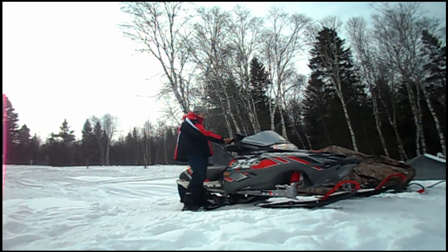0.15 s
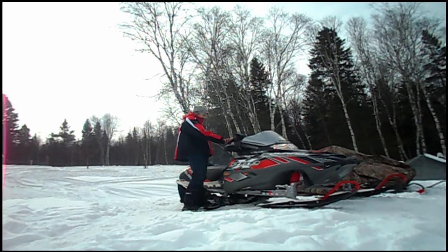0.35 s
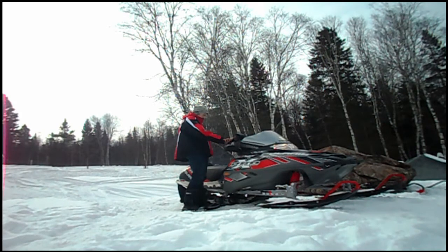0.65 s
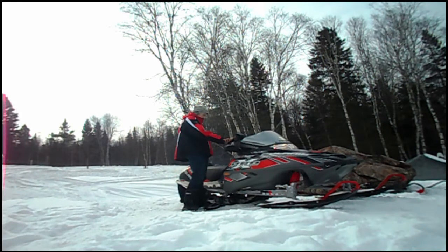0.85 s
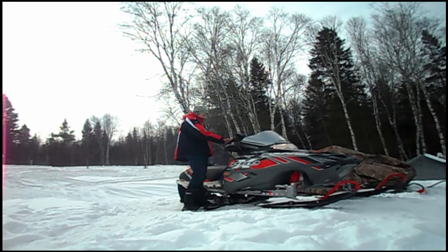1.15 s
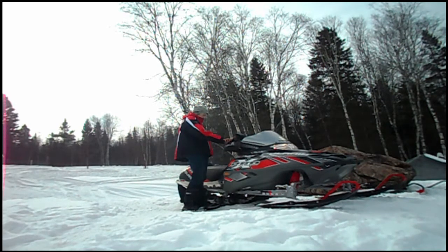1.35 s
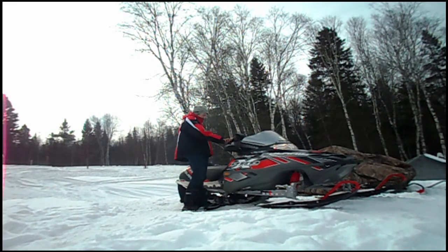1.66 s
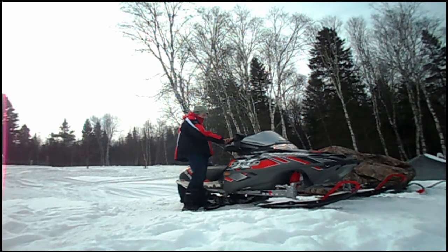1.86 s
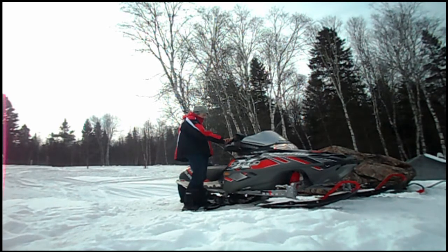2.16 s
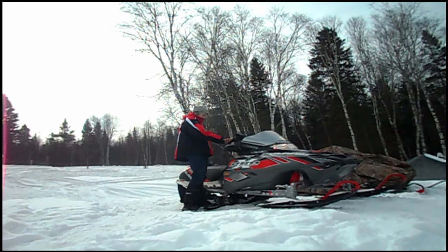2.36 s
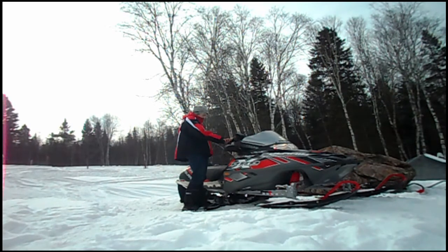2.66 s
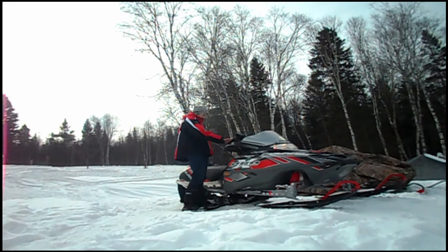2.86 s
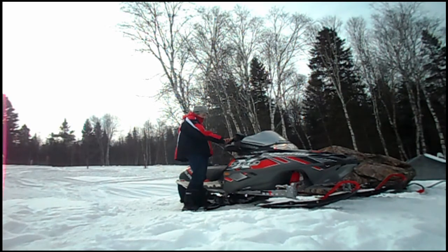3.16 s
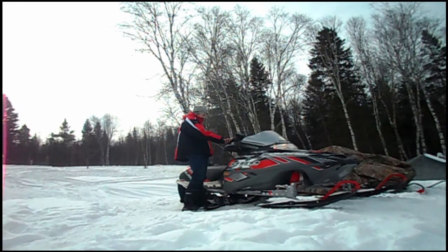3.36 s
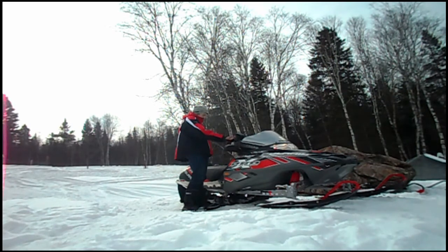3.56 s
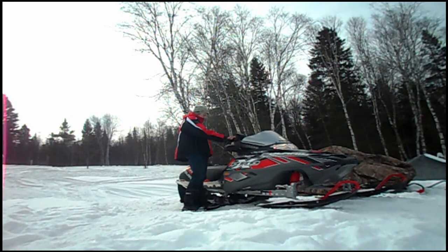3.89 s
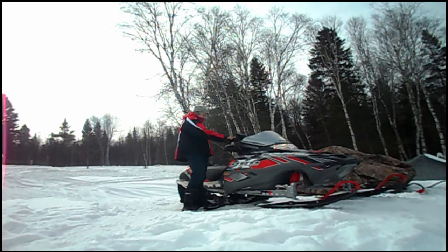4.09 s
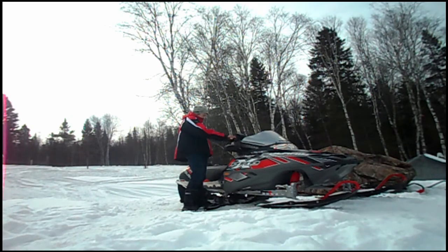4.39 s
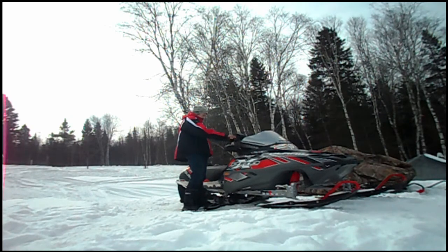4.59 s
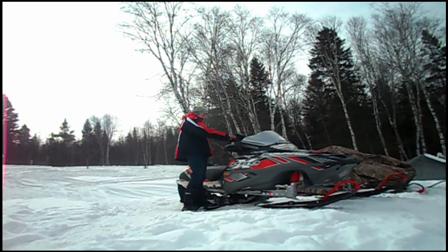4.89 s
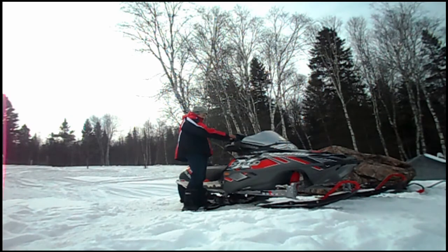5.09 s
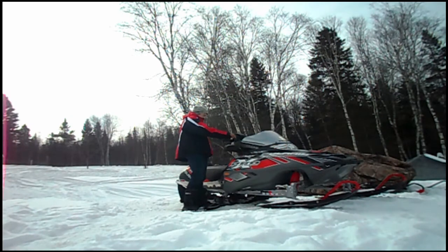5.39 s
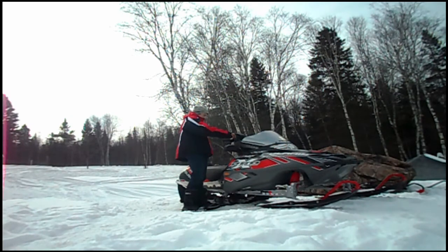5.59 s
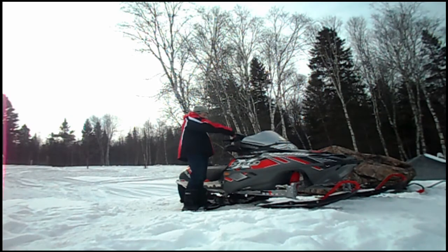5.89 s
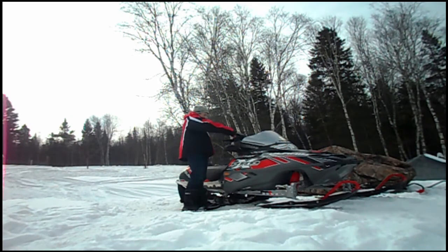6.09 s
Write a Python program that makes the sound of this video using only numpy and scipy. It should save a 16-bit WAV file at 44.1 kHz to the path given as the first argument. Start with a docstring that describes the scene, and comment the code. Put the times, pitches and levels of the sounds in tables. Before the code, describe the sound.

A two-stroke snowmobile is already idling at the start, close by in an open field with no echo. Loud exhaust pops stumble along in a quick, irregular rhythm over an even low throb, metallic piston clatter and a little hiss. The idle holds the same speed until about 4.2 seconds, when the engine is switched off and the popping stops. The throb falls in pitch and fades as the strokes slow and separate, with a light metallic ring from the clutch. Around 5 seconds the belt gives a few short, rough squeaks and scrapes. From about 5.2 to 6.1 seconds the machine rocks to rest with several soft knocks and low thumps. From about 5.5 seconds, small birds give very faint, thin, high whistles over a faint steady wind, until the sound ends just after 6 seconds.

```python
"""A two-stroke twin snowmobile idles in a snowy field. Only some strokes fire, so loud exhaust pops
stumble over an even bed of pumping air and piston clatter. The ignition is cut and the engine winds
down: the clutch sings, the belt rasps, and the machine rocks to rest with a few knocks and thumps.
Small birds whistle thinly in the tail, over a faint wind."""
import sys
import numpy as np
from scipy import signal
from scipy.fft import rfft, irfft, next_fast_len
from scipy.io import wavfile
from scipy.ndimage import map_coordinates

SR = 44100
rng = np.random.default_rng(int(sys.argv[2]) if len(sys.argv) > 2 else 0)


def wav_out(sig):
    """Save sig, one row per channel (or a flat mono array), as 16-bit PCM at SR to the path in sys.argv[1]."""
    wavfile.write(sys.argv[1], SR, np.round(np.clip(np.atleast_2d(sig).T, -1, 1) * 32767).astype(np.int16))


N = 275178
IDLE_HZ, CUT_S = 67.3, 4.245  # strokes per second at idle; when the ignition is cut

# stumbling rhythm of the pops: (time [s], accent [dB], strokes firing in a row [count])
POP_PATTERN = [(.04, -2.5, 2), (.131, -5.5, 1), (.207, -1, 1), (.253, -0.5, 1), (.374, -.5, 2),
               (.466, -1, 2), (.585, -0.5, 1), (.63, -7.5, 1), (.704, 0.5, 2), (.821, -1, 2),
               (.897, -5.5, 2), (.987, -1.5, 1), (1.032, -1, 1), (1.138, 2, 2), (1.27, -2.5, 1),
               (1.315, .5, 1), (1.359, -0.5, 1), (1.463, -6, 2), (1.522, -3, 1), (1.566, -1.5, 1),
               (1.64, -4.5, 1), (1.685, 0, 1), (1.76, -6, 2), (1.849, -3, 1), (1.893, -1, 1),
               (1.997, -2.5, 2), (2.101, -1, 1), (2.146, 0, 1), (2.279, -4, 2), (2.355, -3.5, 1),
               (2.4, 0, 1), (2.502, -1.5, 1), (2.545, -1.5, 1), (2.663, 0, 2), (2.764, -2.5, 2),
               (2.867, -6.5, 2), (2.957, -2, 2), (3.029, -2, 1), (3.073, -2.5, 1), (3.161, -2, 2),
               (3.25, -7, 2), (3.338, -1.5, 1), (3.427, -1, 1), (3.472, -7.5, 1), (3.563, 0, 1),
               (3.637, -7.5, 1), (3.699, -4, 2), (3.821, 0.5, 1), (3.896, 0, 2), (3.999, -1, 1),
               (4.071, -1, 1), (4.115, -3.5, 1), (4.204, -2.5, 1)]
# body of the pipe and silencer: (frequency [Hz], width [Hz], gain [dB])
PIPE_MODES = [(53, 13, -20.5), (66, 46.4, -18.5), (169, 61, -22), (279.5, 18.6, 0), (600, 25, 14)]
# rush of exhaust gas: (frequency [Hz], level [dB])
GAS_SPECTRUM = [(300, -46), (480, 10), (900, 8.5), (1800, 4.5), (3000, 0.5), (4200, -3), (6000, -3.5),
                (8500, -2.5), (10200, 0.5), (11500, -14), (13500, -20), (15500, -28)]
# bright crack of the opening exhaust port: (frequency [Hz], level [dB])
CRACK_SPECTRUM = [(3500, 3), (6000, -18.5), (8500, 2), (10300, 5), (12000, -2), (15500, -13)]
# dry knock of combustion: (frequency [Hz], level [dB])
COMBUSTION_SPECTRUM = [(700, -12), (1050, -1), (1350, 5), (1900, -0.5), (2700, -7), (4000, -13),
                       (10000, -21), (12000, -42)]
# tone the airbox gives the pumped air: (frequency [Hz], gain [dB])
AIRBOX_EQ = [(12, -7), (22, -29), (36, -15), (47, 7.5), (67, 2), (100, 5.5), (135, 1), (165, 6.5),
             (200, -2.5), (235, -9), (278, 11.5), (335, -2), (400, -30), (600, 0), (900, -50)]
# swell and dip of the pumping's upper harmonics as the crank slows: (time [s], gain [dB])
OVERTONE_RIDE = [(4.2, -1), (4.35, 4), (4.5, 4.5), (4.6, -13), (4.8, -7.5), (5.0, -5.5), (5.3, -2.5)]
# low rumble of churned air: (frequency [Hz], level [dB])
CHURN_SPECTRUM = [(16, -7), (30, 0.5), (60, -9), (95, -3), (125, 0), (175, -4), (230, -6.5), (290, -7),
                  (370, -16.5), (600, -42), (2000, -80)]
# ring of the crankcase, clutch and hood: (frequency [Hz], width [Hz], gain [dB])
CASING_MODES = [(582, 82, -1.5), (776, 59, -1.5), (1064.4, 39, 4), (1152, 84, 1.5), (1314, 48, -2),
                (1394, 24, -10), (1866, 49, -11.5), (2030, 21.6, 1), (2225, 88, -9.5), (2454, 33, -4),
                (2405, 43, -24), (2548, 30, -1), (2787, 17, -22), (2940, 42, -39), (3030, 15, -3),
                (3254, 26, -2.5), (3490, 18, -5), (3670, 52, -13)]
# singing clutch sheaves: (frequency [Hz], width [Hz], gain [dB])
CLUTCH_MODES = [(1190, 100, 5), (2030, 83, 4.5), (2200, 160, -8), (2390, 111, -21), (2940, 77, -22)]
# rattle of bearings and clutch: (frequency [Hz], level [dB])
RATTLE_SPECTRUM = [(380, -4), (560, 4.5), (900, 9), (1120, 7.5), (1400, 6), (1700, 0), (2070, -0.5),
                   (2650, 2), (3200, -9), (4000, -23), (6000, -61), (12000, -80)]
# airy hiss on top of the clatter: (frequency [Hz], level [dB])
HISS_SPECTRUM = [(2500, 1.5), (3500, -3), (4300, -5), (5400, -4.5), (8000, -6), (9900, -4.5),
                 (11800, -17.5), (14000, -24), (15600, -31)]
# last knocks of the crank and clutch: (time [s], level [dB])
KNOCK_CUES = [(5.361, -45), (5.383, -48.5), (5.425, -50), (5.479, -45), (5.542, -51.5), (5.603, -56)]
# dull tone of those knocks: (frequency [Hz], level [dB])
KNOCK_SPECTRUM = [(120, -31), (200, -5), (307, -2.5), (470, -15.5), (1310, -6), (1920, -25), (2550, -21),
                  (3750, -43), (6000, -30), (7800, -60), (13200, -120)]
# brief scrapes of the slowing drive: (time [s], level [dB])
SCRAPE_CUES = [(4.862, -43), (4.997, -46.5), (5.502, -61), (5.527, -61)]
# bright tone of those scrapes: (frequency [Hz], level [dB])
SCRAPE_SPECTRUM = [(1500, -26), (3500, 4), (6000, 4), (8300, 1), (10300, 0), (13000, -31)]
# soft thumps of the engine on its mounts: (time [s], pitch [Hz], level [dB])
THUMP_CUES = [(5.191, 50.4, -28), (5.262, 46.8, -30), (5.385, 38.4, -29.5), (5.479, 187, -36),
              (5.505, 55.5, -36), (5.59, 68.6, -35), (5.628, 43.3, -35.5), (5.778, 59, -45.5),
              (6.109, 45, -35.5)]
# bird whistles: (time [s], length [s], start pitch [Hz], middle pitch [Hz], end pitch [Hz], level [dB])
BIRD_CUES = [(5.45, 0.28, 6400, 6430, 6450, -75), (5.665, .028, 6460, 6350, 5600, -67),
             (5.72, 0.071, 6450, 6440, 7000, -74), (5.803, .08, 8850, 8550, 8450, -73),
             (5.865, .035, 9100, 9120, 9100, -68), (5.925, .1, 8850, 8600, 8780, -73),
             (6.087, .07, 8700, 8660, 8450, -74)]
# wind over the field: (frequency [Hz], level [dB])
WIND_SPECTRUM = [(11, -27), (18, 10.5), (66, -10), (131, -17.5), (217, -22.5), (250, -22.5), (2210, -35),
                 (3680, -37.5), (5320, -39.5), (7900, -39.5), (8850, -33.5), (10200, -39.5), (15600, -53)]


def exhaust(soft_hz=181, pop_db=-10, gas_db=-30.5, crack_db=-40):
    """The port opens with a crack, and a rounded pulse rings the pipe amid a rush of gas."""
    times, accent_db = firings()
    pipe = lambda f: -resonances(PIPE_MODES)(f) * np.exp(-(f / soft_hz) ** 2)
    single_pop = filtered(impulses(np.ones(1), np.ones(1)), pipe)
    pops = filtered(impulses(times + .00044, amp(accent_db)), pipe) / np.abs(single_pop).max()
    gas = noise(GAS_SPECTRUM) * bursts(times + .0028, amp(accent_db), rise=.0091, decay=.012)
    crack = noise(CRACK_SPECTRUM) * bursts(times - .004, amp(1.3 * accent_db), rise=.0015, decay=.011)
    return amp(pop_db) * pops + amp(gas_db) * gas + amp(crack_db) * crack


def firings(second_db=-5, carryover=.44):
    """Time and accent [dB] of each firing; a weak pop leaves more charge for the next stroke."""
    times, db, in_a_row = np.transpose(POP_PATTERN)
    twice = in_a_row > 1
    return np.r_[times, times[twice] + 1 / IDLE_HZ], np.r_[db, second_db - carryover * db[twice]]


def speed(friction_hz_per_s=43.4, drag_per_s=.22):
    """Crank speed as a share of idle: steady until the cut, then braked by dry friction and drag."""
    brake = friction_hz_per_s / drag_per_s / IDLE_HZ
    since_cut = np.maximum(clock() - CUT_S, 0)
    return np.maximum((1 + brake) * np.exp(-drag_per_s * since_cut) - brake, 0)


def crank():
    """Running count of strokes since the first pop; every pop lands on a whole stroke."""
    t, fired = clock(), np.array(POP_PATTERN)[:, 0]
    strokes = np.r_[0, np.cumsum(np.round(np.diff(fired) * IDLE_HZ))]
    lead_in = IDLE_HZ * np.minimum(t - fired[0], 0)
    coasting = IDLE_HZ * np.cumsum(speed() * (t > fired[-1])) / SR
    return lead_in + np.interp(t, fired, strokes) + coasting


def cylinder(times):
    """Which of the two cylinders, 0 or 1, fires at each time."""
    return np.round(np.interp(times, clock(), crank())) % 2


def combustion(knock_db=-36, harder_db=5, lead_s=.012):
    """Just before the port opens, the burning charge knocks, harder in the second cylinder."""
    times, accent_db = firings()
    sizes = amp(knock_db + .78 * accent_db + harder_db * cylinder(times))
    return noise(COMBUSTION_SPECTRUM) * bursts(times - lead_s, sizes, rise=.0018, decay=.0066)


def pings(start_hz=3280, fall_hz=560, fall_s=.025, spread_hz=120, strike_db=-35, ring_db=-41):
    """Hot gas rings after each firing, with a sharp ping in the first cylinder; it sinks as it cools."""
    times, accent_db = firings()
    detune, scatter_db = rng.standard_normal((len(times), 2)).T
    ignitions = np.array(POP_PATTERN)[:, 0] - .009
    latest = np.maximum(np.searchsorted(ignitions, clock() + .006) - 1, 0)
    cooling = np.clip((clock() - ignitions[latest]) / fall_s, 0, 1.4)
    hz = start_hz + spread_hz * detune[latest] - fall_hz * cooling + 90 * wobble(500)
    sizes = amp(strike_db + accent_db + scatter_db) * (1 - cylinder(times))
    strike = bursts(times - .0095, sizes, rise=.0025, decay=.01)
    ring = bursts(times + .0034, amp(ring_db + accent_db / 2), rise=.0035, decay=.015)
    return (strike + ring) * amp(3 * wobble(400)) * tone(hz)


def pumping(strokes, pump_db=-28.5, churn_db=-34.5):
    """Each stroke pushes a slightly different sawtooth of air through the airbox and churns up rumble."""
    pace, phase = speed(), 2 * np.pi * strokes
    lower = amp(1.2 * pace * wobble(45))
    smear = .09 * pace * wobble(30)
    ride_db = np.interp(clock(), *np.transpose(OVERTONE_RIDE))
    upper = amp(ride_db + 2.7 * pace * wobble(25))
    saw = sum((upper if k > 2 else lower) * np.sin(k * (phase + smear)) / k for k in range(1, 7))
    throb = filtered(amp(pump_db) * pace ** .053 * saw, colour(AIRBOX_EQ))
    churn = unit(1 + .5 * np.sin(phase)) * noise(CHURN_SPECTRUM)
    return throb + amp(churn_db) * pace ** 1.1 * churn


def clatter(strokes, metal_db=-36, hiss_db=-46.5, hood_hz=4600, slack_speed=.19):
    """Piston slaps ring the casing under the muffling hood; bearings rattle and air hisses in time."""
    pace = speed()
    times, _ = slaps(strokes)
    jitter, scatter_db = rng.standard_normal((len(times), 2)).T
    times, sizes = times + .0001 * jitter, amp(scatter_db)
    # the steady wash fades with speed, so slow strokes stand out one by one
    pulse = unit(pace ** .62 + bursts(times, sizes, rise=.0035, decay=.012))
    casing_scuff, clutch_scuff = pulse * rng.standard_normal((2, N))
    casing = lambda f: resonances(CASING_MODES)(f) / (1 + (f / hood_hz) ** 6)
    slap = pace ** 2 * unit(filtered(impulses(times, sizes), casing))
    ring = unit(filtered(casing_scuff, casing))
    # the clutch sings out as the crank slows
    clutch = unit(filtered(clutch_scuff, resonances(CLUTCH_MODES))) * np.sqrt(np.abs(1 - pace))
    rattle = np.sqrt(pace) * pulse * noise(RATTLE_SPECTRUM)
    metal = amp(-7) * slap + amp(-3.5) * ring + amp(-4.5) * clutch + amp(-6) * rattle
    taut = pace ** 4 / (pace ** 4 + slack_speed ** 4)  # the metal falls quiet near standstill
    hiss = unit(pulse + .053) * noise(HISS_SPECTRUM)
    return amp(metal_db) * pace ** .45 * taut * metal + amp(hiss_db) * pace ** .99 * hiss


def slaps(strokes, lag_strokes=.42):
    """Time and stroke rate [Hz] of each piston slap, a little after its port opens."""
    at = np.flatnonzero(np.diff(np.floor(strokes - lag_strokes)) > 0)
    return at / SR, IDLE_HZ * speed()[at]


def belt(strokes, rasp_db=-46.5, start_hz=2740, rise_hz=340, glide_s=.024, waver_hz=110):
    """Short, rough squeaks on every other slow stroke, rising as the belt tightens."""
    times, stroke_hz = slaps(strokes)
    times = times[(stroke_hz > 18) & (stroke_hz < 37.6)][::2]
    t = clock()
    nearest = times[np.abs(t - times[:, None]).argmin(axis=0)]
    glide = np.clip((t - nearest + .0037) / glide_s, 0, 1)
    hz = start_hz + rise_hz * glide + waver_hz * wobble(700)
    envelope = bursts(times, np.ones(len(times)), rise=.006, decay=.011)
    return envelope * amp(rasp_db + 2 * wobble(410)) * tone(hz)


def settling():
    """The drive scrapes, crank and clutch knock, and the engine rocks to rest on its mounts."""
    times, db = np.transpose(KNOCK_CUES)
    knocks = noise(KNOCK_SPECTRUM) * bursts(times + .0042, amp(db), rise=.0049, decay=.018)
    times, db = np.transpose(SCRAPE_CUES)
    scrapes = noise(SCRAPE_SPECTRUM) * bursts(times + .0026, amp(db), rise=.0033, decay=.016)
    thumps = np.zeros(N)
    for start, hz, db in THUMP_CUES:
        cycles = np.maximum(clock() - start, 0) * hz
        envelope = cycles / .28 * np.exp(1 - cycles / .38)
        thumps -= amp(db) * envelope * np.sin(2 * np.pi * cycles)
    return knocks + scrapes + thumps


def birds(waver_hz=90, flutter_db=3):
    """High, slightly wavering whistles from the trees."""
    out, waver = np.zeros(N), waver_hz * wobble(300)
    for start, length, *pitches, db in BIRD_CUES:
        span = np.arange(round(start * SR), min(round((start + length) * SR), N))
        progress = (span / SR - start) / length
        hz = np.interp(progress, [0, .5, 1], pitches) + waver[span]
        envelope = np.sqrt(np.abs(np.sin(np.pi * progress)))
        out[span] += amp(db) * envelope * tone(hz)
    return out * amp(flutter_db * wobble(60))


def wind(level_db=-51):
    """A faint, steady bed of air moving over the field."""
    return amp(level_db) * noise(WIND_SPECTRUM)


def amp(db):
    return 10 ** (np.asarray(db) / 20)


def unit(x):
    return x / np.sqrt(np.mean(x ** 2) + 1e-20)


def clock():
    return np.arange(N) / SR


def tone(hz):
    return np.sin(2 * np.pi * np.cumsum(hz) / SR)


def wobble(rate):
    """Smooth random modulation, `rate` points a second."""
    return map_coordinates(rng.standard_normal(int(N * rate / SR) + 4), [clock() * rate])


def filtered(x, response):
    """x shaped by a complex frequency response."""
    size = next_fast_len(N + SR // 2)
    return irfft(rfft(x, size) * response(np.fft.rfftfreq(size, 1 / SR)), size)[..., :N]


def colour(points):
    """EQ curve through (frequency [Hz], gain [dB]) points, rolling off below the first."""
    f, db = np.transpose(points)
    return lambda hz: amp(np.interp(np.log(hz + 1), np.log(f + 1), db)) * np.minimum(hz / f[0], 1) ** 2


def resonances(modes):
    """Resonator bank of (frequency [Hz], width [Hz], gain [dB]) modes."""
    return lambda f: sum(amp(db) * 1j * f * w / (c * c - f * f + 1j * f * w) for c, w, db in modes)


def noise(points):
    """Coloured noise of rms 1."""
    return unit(filtered(rng.standard_normal(N), colour(points)))


def impulses(times, sizes):
    """One click at each time."""
    return np.bincount(np.clip(np.round(times * SR).astype(int), 0, N - 1), sizes, N)


def bursts(times, sizes, rise, decay):
    """Envelope that swells up to each time and dies away after it; rise and decay in seconds."""
    t = np.arange(-SR // 10, SR // 4) / SR
    shape = np.exp(-2 * np.where(t < 0, (t / rise) ** 2, t / decay))
    power = signal.fftconvolve(impulses(times, sizes ** 2), shape)[SR // 10:][:N]
    return np.sqrt(np.abs(power))


def scene():
    """The machine up front in an open field: mono, with no echo."""
    strokes = crank()
    engine = pumping(strokes) + exhaust() + combustion() + pings() + clatter(strokes)
    return (engine + wind() + belt(strokes) + settling() + birds())[None]


def record(dry, top_hz=15780):
    """A brick-wall low-pass trims the very top."""
    return filtered(dry[0], lambda hz: hz < top_hz)[None]


dry = scene()
out = record(dry)
wav_out(out)
```